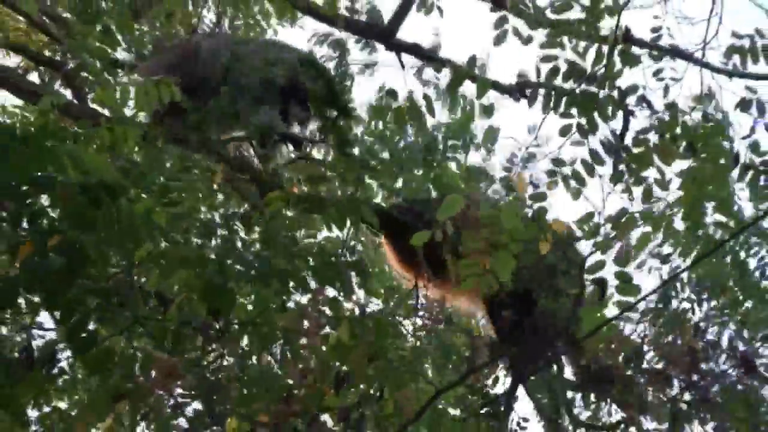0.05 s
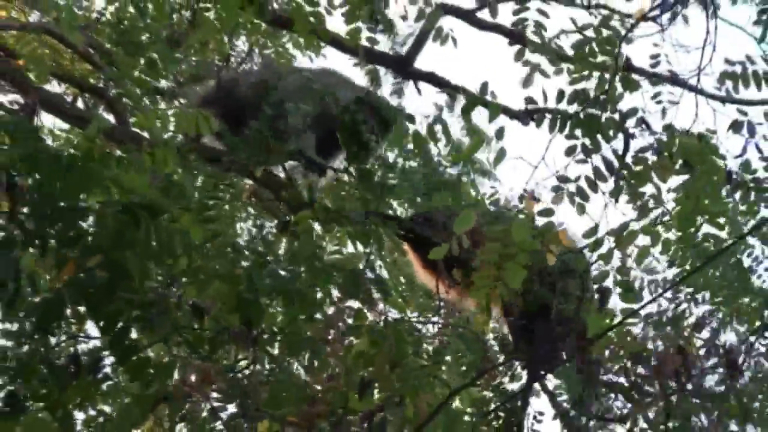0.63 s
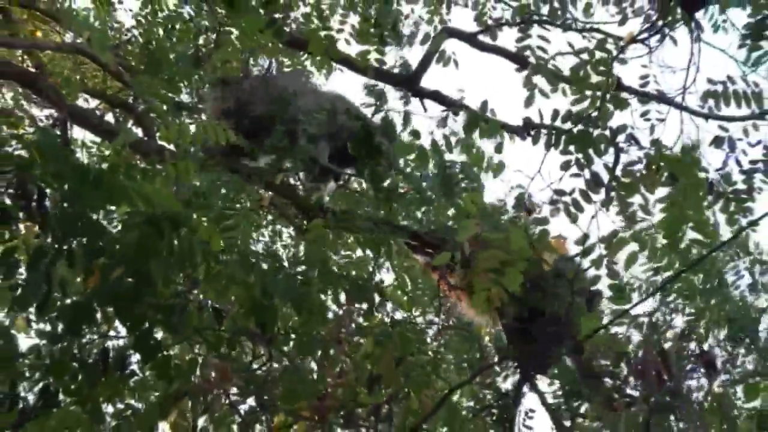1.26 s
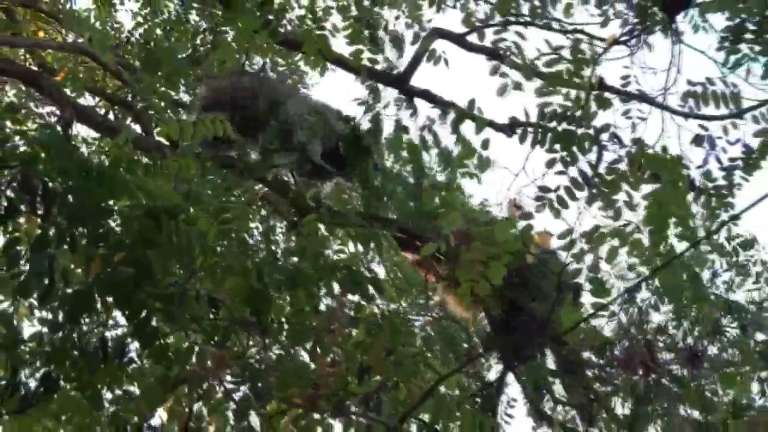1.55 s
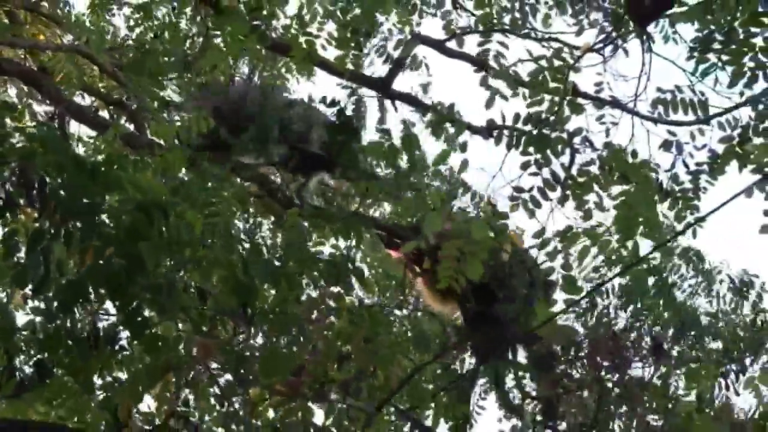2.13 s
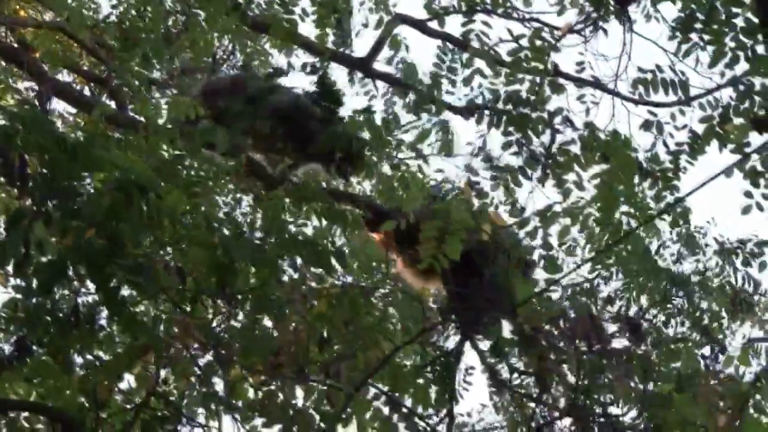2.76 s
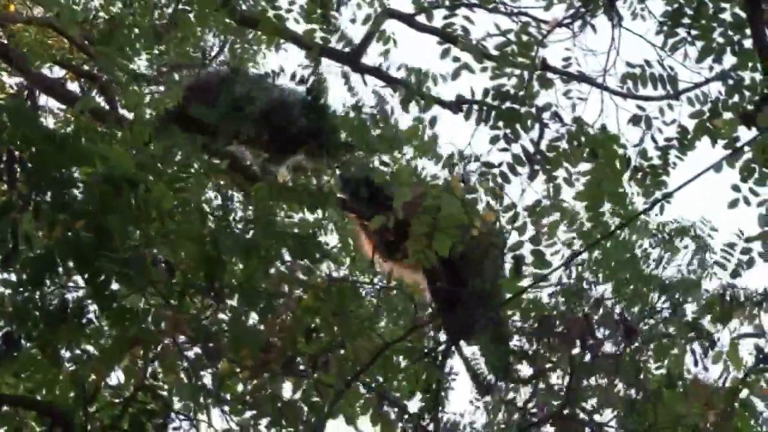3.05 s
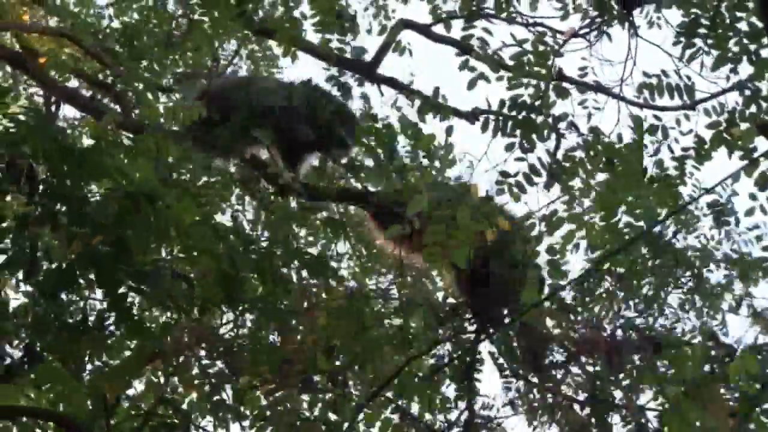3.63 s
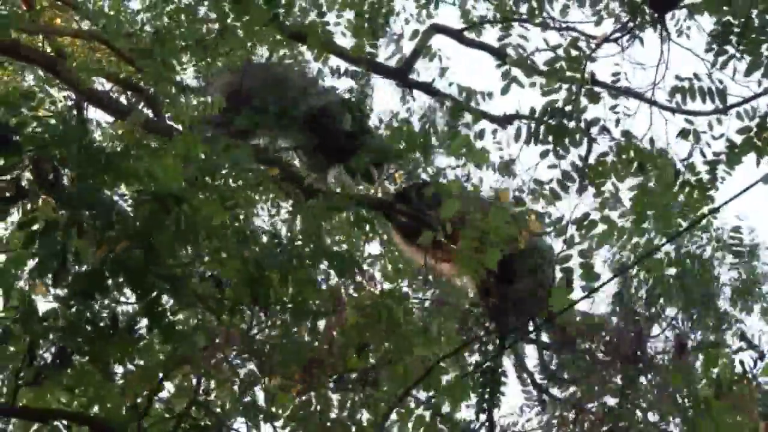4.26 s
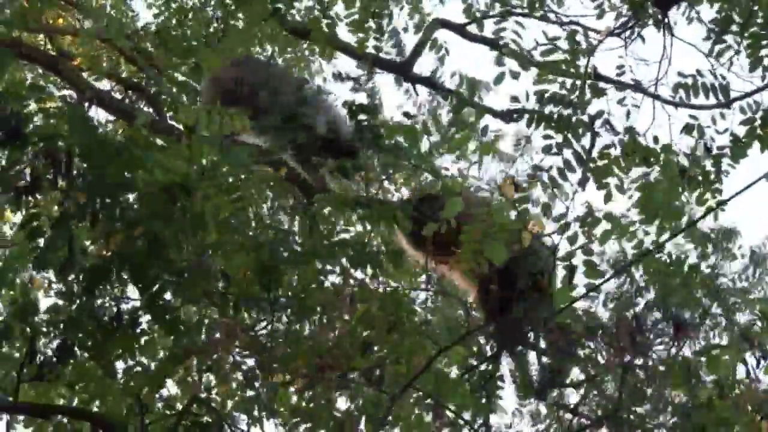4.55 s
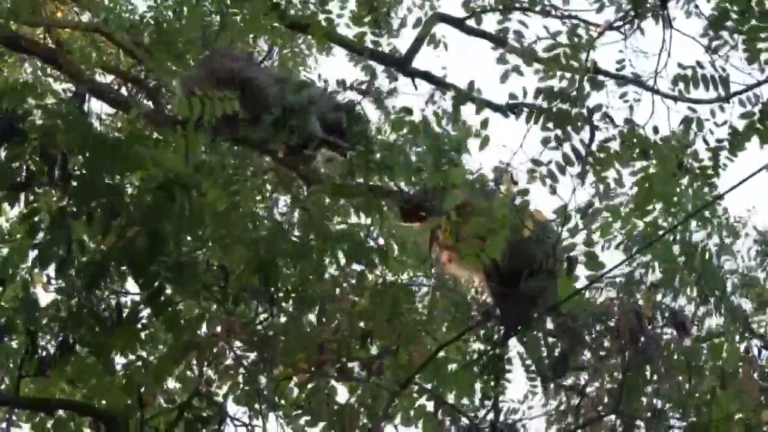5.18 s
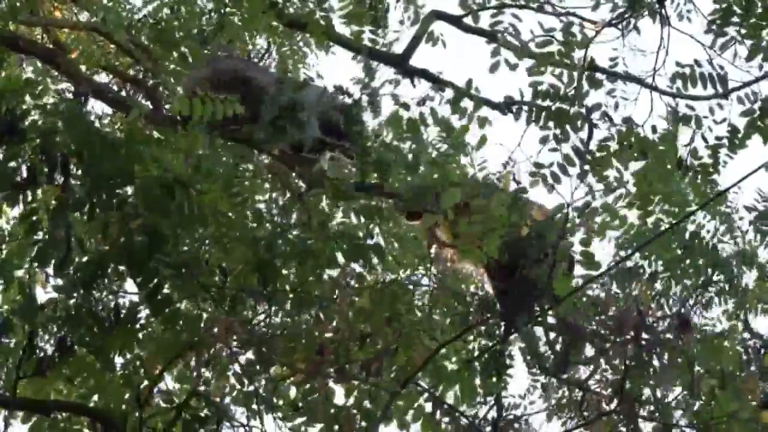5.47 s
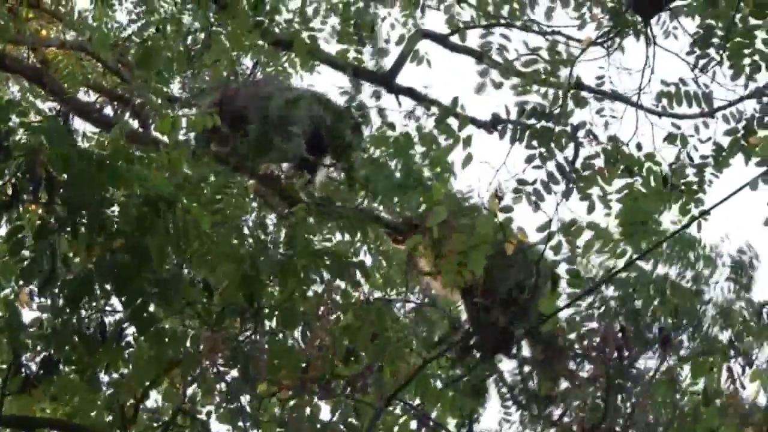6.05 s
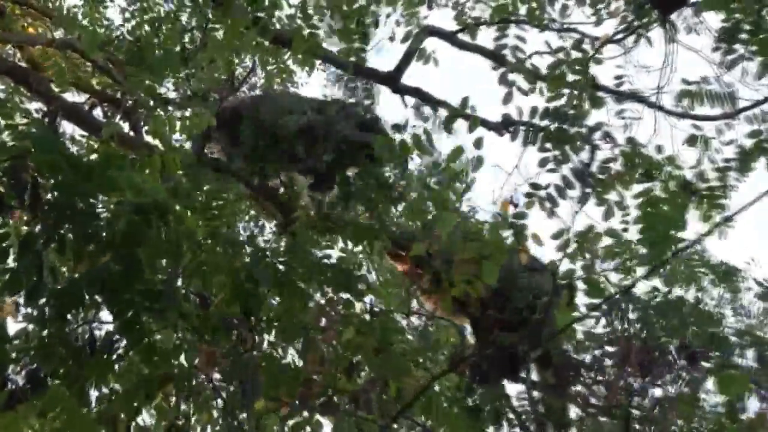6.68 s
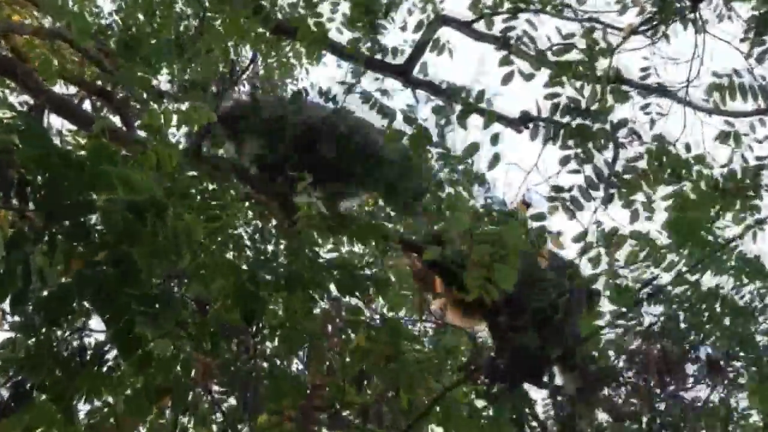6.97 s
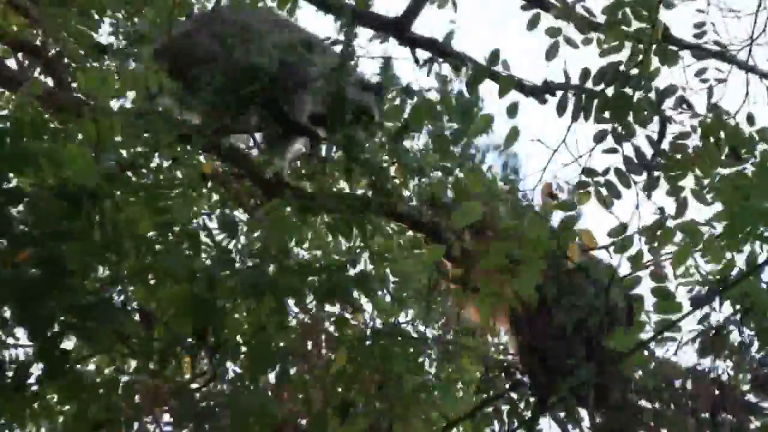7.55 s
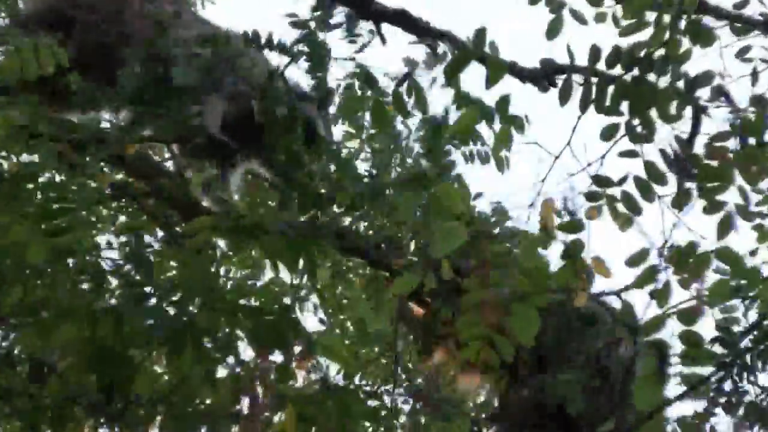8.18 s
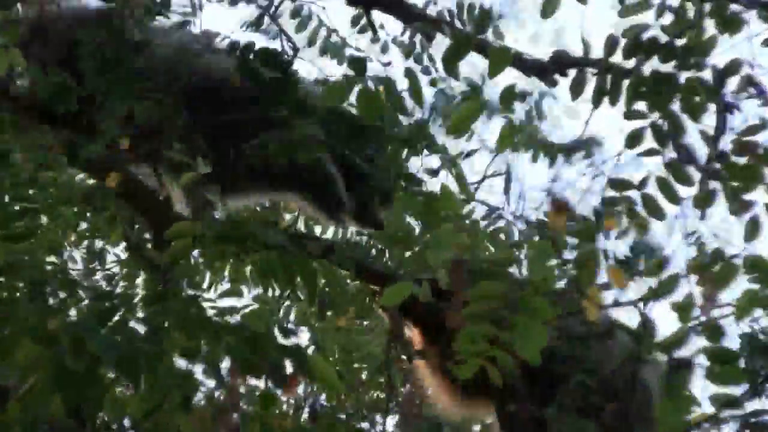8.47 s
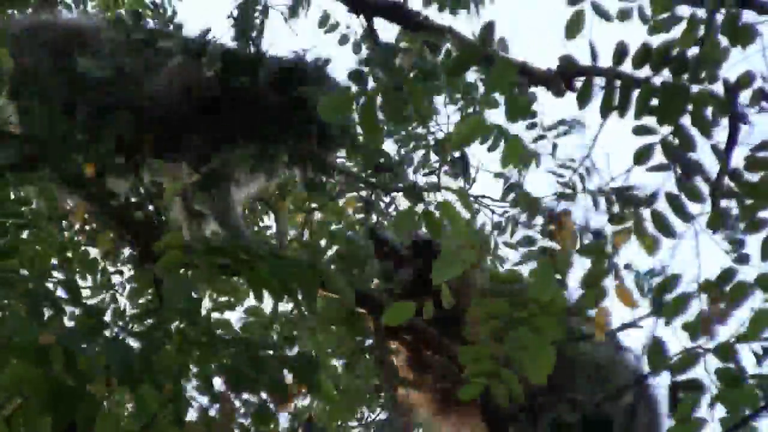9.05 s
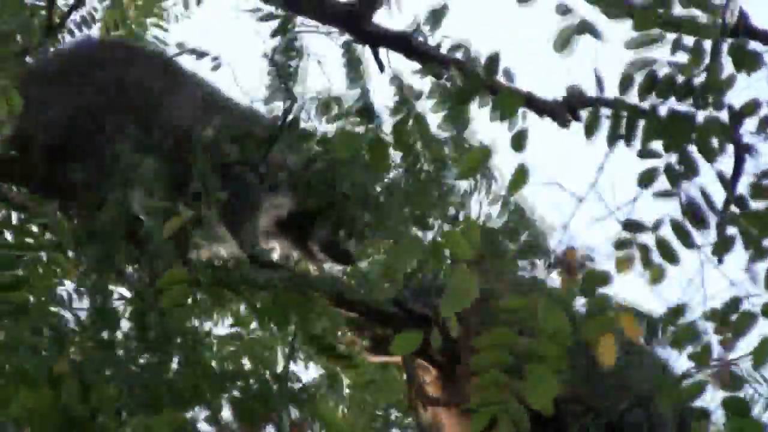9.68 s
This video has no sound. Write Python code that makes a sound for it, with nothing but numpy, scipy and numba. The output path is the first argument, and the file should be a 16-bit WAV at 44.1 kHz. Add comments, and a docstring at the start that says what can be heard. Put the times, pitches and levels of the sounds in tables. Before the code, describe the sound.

Raccoons growl, rasp and snarl at each other in short hissing outbursts on a leafy branch, over a faint distant rumble.

```python
"""Snarls and growls of two raccoons quarrelling on a branch, heard from the ground below.
Snarls and barks: fast chaotic pulses through an open mouth, with hiss at the teeth. Growls: slow
slaps of throat tissue behind a nearly shut mouth. Air rasps and wheezes in a tight throat; one whines.
Twigs snap, leaves rustle and a distant rumble lies underneath. The ground reflects voices and snaps;
the surroundings add a thin tail."""
import sys
import numpy as np
from scipy import signal
from scipy.fft import rfft, irfft, next_fast_len
from scipy.io import wavfile
from scipy.ndimage import uniform_filter1d
from numba import njit

SR = 44100
rng = np.random.default_rng(int(sys.argv[2]) if len(sys.argv) > 2 else 0)


def store_pcm(level_fs):
    """Save levels as 16-bit WAV."""
    pcm = np.round(np.clip(level_fs, -1, 1) * 32767).astype(np.int16)
    wavfile.write(sys.argv[1], SR, np.atleast_2d(pcm).T)


N = 432621
TIME = np.arange(N) / SR


def from_db(db):
    return 10 ** (np.asarray(db) / 20)


def unit_rms(x):
    return x / np.sqrt(np.mean(x ** 2) + 1e-20)


def level_out(x, window_samples=700):
    """Hold the short-term RMS at one."""
    return x / np.sqrt(np.abs(uniform_filter1d(x * x, window_samples)) + 1e-12)


def interp_rows(rows, x):
    """Interpolate the other columns against the first."""
    knots, *columns = np.transpose(rows)
    return [np.interp(x, knots, column) for column in columns]


def gated_span(start_s, end_s, rise_s=0.0017, fall_s=0.006):
    """Sample indices and linear gate of one event."""
    at = np.arange(max(0, int(start_s * SR)), min(N, int((end_s + fall_s) * SR)))
    t = at / SR
    return at, np.clip((t - start_s) / rise_s, 0, 1) * np.clip((end_s + fall_s - t) / fall_s, 0, 1)


def drift(t, rate_hz):
    """Linearly interpolated noise, spread near one."""
    position = (t - t[0]) * rate_hz
    count = int(position[-1]) + 2
    return np.interp(position, np.arange(count), rng.standard_normal(count))


def butter(x, edge_hz, kind, order=2):
    return signal.sosfilt(signal.butter(order, edge_hz, kind, fs=SR, output="sos"), x)


def decay(impulses, tau_s):
    return signal.lfilter([1], [1, -np.exp(-1 / (tau_s * SR))], impulses)


def colour(x, spectrum):
    """Minimum-phase filter from rows of freq_hz, gain_db."""
    size = next_fast_len(x.shape[-1] + 2048, True)
    freq_hz, gain_db = np.transpose(spectrum)
    bins_hz = np.maximum(np.arange(size // 2 + 1) * SR / size, 1)
    gain = from_db(np.interp(np.log(bins_hz), np.log(freq_hz), gain_db))
    cepstrum = irfft(np.log(gain), size)
    cepstrum[1:size // 2] *= 2
    cepstrum[size // 2 + 1:] = 0
    return irfft(rfft(x, size) * np.exp(rfft(cepstrum)), size)[..., :x.shape[-1]]


@njit
def resonate(x, centre_hz, width_hz):
    """Two-pole resonance with a moving centre and unity peak gain."""
    y, r = np.zeros(len(x)), np.exp(-np.pi * width_hz / SR)
    for i in range(2, len(x)):
        feedback = 2 * r * np.cos(2 * np.pi * centre_hz[i] / SR) * y[i - 1] - r * r * y[i - 2]
        y[i] = (1 - r * r) / 2 * (x[i] - x[i - 2]) + feedback
    return y


def formant(x, centre_hz, width_hz):
    """Two resonances in series for steep skirts."""
    return resonate(resonate(x, centre_hz, width_hz), centre_hz, width_hz)


# Side relative to mid: freq_hz, gain_db
DIFFUSE_WIDTH = [(50, -27), (100, -28), (200, -12.5), (400, -2.5), (800, -6.5), (1500, -12.5), (4000, -11),
                 (12000, -105.5)]
def diffuse_stereo(mid, side):
    """Diffuse sound differs between the ears mostly in the low mids."""
    return mid + colour(side, DIFFUSE_WIDTH) * np.array([[1], [-1]])


# Reverb tail spectrum: freq_hz, gain_db
TAIL_SPECTRUM = [(100, 5), (400, 5.5), (1000, -1.5), (2200, 2.5), (5000, 0.5), (12000, 3)]
def surroundings(x, scatter_db=-15, scatter_s=0.0016, side_db=-22, tail_gain_db=-15, t60_s=0.85):
    """Direct sound, early scatter from the branches and a thin tail, in stereo."""
    age = np.arange(SR) / SR
    noise = rng.standard_normal((4, SR))
    scatter = noise[2:] * np.exp(-age / scatter_s) * (age > .001)
    mid, side = scatter / np.linalg.norm(scatter[0])
    early = from_db(scatter_db) * mid + from_db(side_db) * side * np.array([[1], [-1]])
    early[:, 0] += 1
    tail = noise[:2] * from_db(-60 * age / t60_s) * np.clip(age / 0.022, 0, 1)
    tail = colour(from_db(tail_gain_db) * tail / np.linalg.norm(tail[0]), TAIL_SPECTRUM)
    return signal.fftconvolve(x[None], early + diffuse_stereo(*tail), axes=1)[:, :N]


def ground_bounce(x, delay_s, reflectance=0.5, cutoff_hz=5000):
    """Direct sound plus one dull ground reflection."""
    pole = np.exp(-2 * np.pi * cutoff_hz / SR)
    delayed = np.pad(x, (int(delay_s * SR), 0))[:N]
    return x + reflectance * signal.lfilter([1 - pole], [1, -pole], delayed)


# Drone envelope: time_s, level_db
DRONE_LEVELS = [(0, -65), (2.5, -60.5), (6, -62), (7.5, -60), (8.3, -54.5), (9.81, -54)]
def drone(band_hz=(62, 105)):
    """Deepest part of the distant rumble: mono, growing towards the end."""
    level_db, = interp_rows(DRONE_LEVELS, TIME)
    return from_db(level_db) * unit_rms(butter(rng.standard_normal(N), band_hz, "band"))


# Rumble spectrum: freq_hz, gain_db
RUMBLE_SPECTRUM = [(25, -43), (45, -29), (65, -7.5), (130, -1), (260, 2.5), (400, -5.5), (750, -3.5),
                   (1200, -8.5), (2100, -14), (2800, -29), (6000, -27.5), (10000, -39), (13500, -57)]
# Rumble envelope: time_s, level_db
RUMBLE_LEVELS = [(0, -41), (1.5, -42.5), (3, -41.5), (4.5, -43), (6, -42), (7.2, -43), (8.3, -43),
                 (9.1, -42.5), (9.81, -39.5)]
def rumble(swell_db=0.8, swell_hz=2.04):
    """Far-off diffuse rumble with a faint hiss on top."""
    mid, side = (unit_rms(colour(white, RUMBLE_SPECTRUM)) for white in rng.standard_normal((2, N)))
    level_db, = interp_rows(RUMBLE_LEVELS, TIME)
    return from_db(level_db + swell_db * drift(TIME, swell_hz)) * diffuse_stereo(mid, side)


# Rustle spectrum: freq_hz, gain_db
LEAF_SPECTRUM = [(1000, -37), (2800, -3), (4500, 0), (6000, 1), (7000, 1), (9500, 3.5), (11500, 3.5),
                 (13500, -8.5)]
# Branch shakes: start_s, level_db
LUNGES = [(1.78, -51.5), (3.15, -45), (3.87, -46.5), (6.48, -54.5), (7.0, -45), (8.78, -42.5), (9.52, -89)]
def leaves(breeze_db=-63, attack_s=0.054, settle_db_per_s=12, touches_per_s=60, touch_s=0.0026):
    """Leaves brush together in a ticking hiss, stirred by a breeze and by each lunge."""
    touches = (rng.random(N) < touches_per_s / SR) * from_db(-7 * rng.standard_normal(N))
    ticks = unit_rms(decay(touches + 1e-18, touch_s))
    power = from_db(breeze_db) ** 2
    for start_s, level_db in LUNGES:
        age = np.maximum(TIME - start_s, 0)
        shake = np.minimum(age / attack_s, 1) * from_db(level_db - settle_db_per_s * age)
        power = power + shake ** 2
    hiss = (1 + 0.21 * ticks) * rng.standard_normal(N)
    return np.sqrt(power) * unit_rms(colour(hiss, LEAF_SPECTRUM))


# Twig breaks, before gain and spectrum: start_s, level_db, highpass_hz, rustle_rel_db
SNAPS = [(6.0727, -22, 6000, -14), (9.198, -18, 617, -39), (9.5155, -3.5, 403, -12.5),
         (9.536, -9, 3240, -14)]
# Breaking wood: freq_hz, gain_db
WOOD_SPECTRUM = [(200, 2), (1000, -2), (2200, 3.5), (4200, 6), (6500, -3), (9000, 2), (13500, -6)]
def twigs(gain_db=-8, crack_s=0.0014, rustle_s=0.036):
    """Wood cracks, then the shaken leaves rustle; thin twigs have no low end."""
    out = np.zeros(N)
    for start_s, level_db, highpass_hz, rustle_rel_db in SNAPS:
        at, _ = gated_span(start_s, start_s + .25)
        age = (at - at[0]) / SR
        envelope = np.exp(-age / crack_s) + from_db(rustle_rel_db) * np.exp(-age / rustle_s)
        burst = butter(envelope * rng.standard_normal(len(at)), highpass_hz, "high")
        out[at] += from_db(level_db + gain_db) * burst
    return colour(out, WOOD_SPECTRUM)


# Wheezes: start_s, length_s, first_db, last_db, centre_hz
WHEEZES = [(1.674, 0.037, -44, -48, 1800), (6.751, 0.093, -41, -50, 2020), (8.163, 0.14, -42.5, -53, 1900),
           (8.266, 0.172, -59, -54, 2100), (8.951, 0.144, -32, -34, 1980)]
def wheezes(width_hz=420):
    """Turbulent air rings one resonance of a narrowed throat."""
    out = np.zeros(N)
    for start_s, length_s, first_db, last_db, centre_hz in WHEEZES:
        at, gate = gated_span(start_s, start_s + length_s, rise_s=0.018, fall_s=0.014)
        ring = formant(rng.standard_normal(len(at)), np.full(len(at), float(centre_hz)), width_hz)
        out[at] += gate * from_db(np.linspace(first_db, last_db, len(at))) * unit_rms(ring)
    return out


# Whine contour: time_s, pitch_hz, level_db
WHINE_CONTOUR = [(5.445, 630, -46), (5.475, 690, -38), (5.5, 740, -36), (5.522, 835, -40), (5.55, 925, -38),
                 (5.573, 1005, -38), (5.592, 1115, -38), (5.612, 1195, -36), (5.648, 1230, -36),
                 (5.675, 1200, -52)]
# Nasal response: freq_hz, gain_db
NOSE_RESPONSE = [(600, 0), (1250, 0), (1600, -7), (2000, -14), (2450, -14), (3000, -30), (3600, -19),
                 (4500, -19), (5000, -23), (5600, -22), (6200, -26), (6700, -25), (8500, -29)]
def whine(pitch_waver=0.02, rough_db=3, tilt_db=6, harmonics=7):
    """A reedy voice slides up an octave, its harmonics crossing the resonances of the nose."""
    at, gate = gated_span(WHINE_CONTOUR[0][0], WHINE_CONTOUR[-1][0])
    t = at / SR
    pitch_hz, level_db = interp_rows(WHINE_CONTOUR, t)
    phase = 2 * np.pi * np.cumsum(pitch_hz * (1 + pitch_waver * drift(t, 149))) / SR
    db_per_harmonic = tilt_db * np.log2(pitch_hz / pitch_hz.max())   # a slack, low voice is purer
    out = np.zeros(N)
    for k in range(1, harmonics + 1):
        nose_db, = interp_rows(NOSE_RESPONSE, k * pitch_hz)
        harmonic_db = nose_db + (k - 1) * db_per_harmonic + rough_db * drift(t, 130)
        out[at] += gate * from_db(level_db + harmonic_db) * np.sin(k * phase)
    return out


def flutter(t, pulse_hz, jitter, shimmer_db, breath, puff_s):
    """Tissue slaps shut at uneven intervals; each slap passes a puff of turbulent air."""
    rate_hz = pulse_hz * np.exp(jitter * drift(t, pulse_hz))
    cycles = np.floor(np.cumsum(rate_hz) / SR)
    slaps = np.diff(cycles, prepend=-1) * from_db(shimmer_db * rng.standard_normal(len(t)))
    puffs = decay(slaps, puff_s) * rng.standard_normal(len(t))
    return level_out(unit_rms(slaps) + breath * unit_rms(puffs))


# Tight-throat resonances: centre_hz, width_hz, gain_db
RASP_RINGS = [(1215, 230, 4), (1830, 270, 3), (3850, 400, -16)]
def rasp_rings(source, t, progress, waver=.025, waver_hz=18, flicker_db=1, sag=.07):
    """Resonances waver as the throat moves and sink as the rasp runs out."""
    rings = 0
    for centre_hz, width_hz, gain_db in RASP_RINGS:
        gain = from_db(gain_db + flicker_db * drift(t, waver_hz))
        tuning = 1 - sag * (progress - .5) + waver * drift(t, waver_hz)
        rings += gain * formant(source, centre_hz * tuning, width_hz)
    return unit_rms(rings)


# Throat, nose and chest spectra: freq_hz, gain_db
THROAT_SPECTRUM = [(40, -49), (350, -15.5), (560, -2.5), (720, -3), (880, -12), (1140, 3), (1300, -5.5),
                   (1500, -3.5), (1800, 5), (2050, -5.5), (2350, -4), (2800, -11), (3100, -31), (5000, -63)]
NOSE_SPECTRUM = [(2500, 6.5), (3100, 1.5), (3600, 7.5), (4250, 5), (4800, 5.5), (5800, 6.5), (6700, -9),
                 (7800, 3), (9300, -1), (11000, -4.5), (13500, -21)]
CHEST_SPECTRUM = [(50, -67), (110, -15.5), (155, -2.5), (290, -5.5), (360, -4), (430, -1.5), (560, -7.5),
                  (900, -39)]
# In-breaths, before gains: start_s, length_s, level_db, swell_db, nose_rel_db, ring_rel_db
RASPS = [(.27, 0.77, -42, 10, -7.5, -4), (1.919, 0.52, -38.5, -0.5, -8.5, -9.5),
         (3.251, 0.48, -34, -3, -12, -16), (4.1, 0.69, -38.5, 4, -8, -10),
         (4.721, 0.33, -37, -1.5, -5.5, -20), (5.581, 0.63, -41, 1, -9, -5.5),
         (6.706, 0.29, -44, 12, -4, 1.5), (7.168, 0.54, -32, -3, -6.5, -7.5),
         (8.9, 0.52, -33.5, -3, -6.5, -17)]
def rasps(attack_s=0.14, attack_db=4.5, release_s=0.1, release_db=16.5, arch_db=2, waver_db=1.1,
          throat_gain_db=-0.5, nose_gain_db=-1.5):
    """One inward airflow flutters and rings in the throat, hisses in the nose and hums in the chest."""
    out = np.zeros(N)
    for start_s, length_s, level_db, swell_db, nose_rel_db, ring_rel_db in RASPS:
        at, gate = gated_span(start_s, start_s + length_s + release_s, rise_s=0.0062, fall_s=0.021)
        t = at / SR
        age = t - start_s
        progress = np.clip(age / length_s, 0, 1)
        flow_db = level_db + swell_db * (progress - .5) + arch_db * (np.sin(np.pi * progress) - .5)
        flow_db -= attack_db * np.clip(1 - age / attack_s, 0, 1)
        flow_db -= release_db * np.clip((age - length_s) / release_s, 0, 1)
        source = flutter(t, pulse_hz=109.7, jitter=.5, shimmer_db=1.5, breath=2.6, puff_s=0.0073)
        throat_db = flow_db + throat_gain_db + waver_db * drift(t, 37)
        nose_db = flow_db + nose_rel_db + nose_gain_db
        chest_db = -44 + 0.68 * (flow_db + 38.5)   # follows the flow only in part
        throat = from_db(throat_db) * unit_rms(colour(source, THROAT_SPECTRUM))
        nose = from_db(nose_db) * unit_rms(colour(rng.standard_normal(len(t)), NOSE_SPECTRUM))
        chest = from_db(chest_db) * unit_rms(colour(source, CHEST_SPECTRUM))
        rings = from_db(flow_db + ring_rel_db) * rasp_rings(source, t, progress)
        out[at] += gate * (throat + rings + nose + chest)
    return out


def growl_rings(source, resonances, spread_db=2.8, detune=.04):
    """Parallel throat resonances, each randomly off in strength and pitch."""
    rings = 0
    for centre_hz, width_hz, gain_db in resonances:
        louder, higher = rng.standard_normal(2)
        detuned_hz = np.full(len(source), centre_hz * (1 + detune * higher))
        rings += from_db(gain_db + spread_db * louder) * resonate(source, detuned_hz, width_hz)
    return rings


# Throat resonances, mouth nearly shut: centre_hz, width_hz, gain_db
SHUT_THROAT = [(234, 114, -2), (710, 110, 5), (1048, 97, 3.5), (1127, 110, 15), (1280, 52, -10.5)]
# Resonances let out as the lips part: centre_hz, width_hz, gain_db
UPPER_THROAT = [(1440, 490, -7), (1690, 180, 6.5)]
def growl_pulse(upper_db, air=.45, puff_s=0.022, stray_db=-12, cutoff_hz=2150):
    """A slap of slack tissue, a stray slap and an air puff ring the throat; the mouth muffles them."""
    size, lead_samples = 2400, 220
    age = np.arange(size) / SR
    puff = rng.standard_normal(size) * np.exp(-age / puff_s)
    source = air * puff / np.linalg.norm(puff)
    source[lead_samples] += 1
    source[rng.integers(size // 2)] += from_db(stray_db)
    voice = growl_rings(source, SHUT_THROAT) + from_db(upper_db) * growl_rings(source, UPPER_THROAT)
    voice = butter(voice, cutoff_hz, "low", order=10)
    return np.arange(size) - lead_samples, voice / np.abs(voice).max()


# Pulse runs, before gain: start_s, end_s, pulse_hz, peak_db, sag_db, upper_db
GROWLS = [(0.016, 0.18, 36.6, -27, -4, -13), (1.157, 1.242, 35.3, -25, -0.5, 1),
          (1.269, 1.548, 35.8, -23.5, 7, 0), (1.575, 1.61, 29, -26, 10, -2), (2.57, 2.57, 38, -29, 0, 2),
          (2.595, 2.595, 38, -19.5, 0, 1), (2.626, 2.734, 37, -23.5, -1.5, -2.5),
          (2.76, 2.838, 38.5, -24.5, 0, -2), (2.865, 2.891, 38, -23.5, -2, 1),
          (2.918, 2.947, 35, -26.5, 2, -4), (5.18, 5.215, 28, -27.5, 1, -1),
          (5.237, 5.292, 36, -27, 11, -8), (5.315, 5.392, 39, -27.5, -1, -10),
          (5.425, 5.529, 38.5, -28.5, 1.5, -8), (6.377, 6.403, 38, -22.5, 5, 0),
          (6.432, 6.51, 38.5, -26.5, -3, -3), (6.533, 6.557, 41, -21.5, -1, 13),
          (6.583, 6.637, 37, -25, 1, -5), (6.661, 6.687, 38, -22.5, 1.5, -4),
          (7.837, 7.837, 38, -29, 0, -8), (7.929, 8.007, 38, -25.5, 7, -13), (8.029, 8.029, 38, -21, 0, -7),
          (8.058, 8.112, 37, -29, 6, -7)]
def growls(gain_db=2.0, jitter_s=.0005):
    """Runs of slow, separate throat pulses, no two alike."""
    out = np.zeros(N)
    for start_s, end_s, pulse_hz, peak_db, sag_db, upper_db in GROWLS:
        count = int(round((end_s - start_s) * pulse_hz)) + 1
        for progress in np.linspace(0, 1, count):
            slap_s = start_s + (end_s - start_s) * progress + jitter_s * rng.standard_normal()
            offsets, pulse = growl_pulse(upper_db)
            at = np.clip(offsets + int(slap_s * SR), 0, N - 1)
            out[at] += from_db(peak_db + gain_db - sag_db * progress) * pulse
    return out


def mouth_formants(source, formants, mouth_hz, width_ratio):
    """Parallel mouth resonances of alternating polarity."""
    return sum((-1) ** k * from_db(gain_db) * formant(source, ratio * mouth_hz, width_ratio * width_hz)
               for k, (ratio, width_hz, gain_db) in enumerate(formants))


# Deep and bright mouth resonances: freq_ratio, width_hz, gain_db
DEEP_FORMANTS = [(.36, 298, -15), (.64, 327, -4.5)]
BRIGHT_FORMANTS = [(.93, 420, 9.5), (1.17, 580, 1.5), (1.5, 710, -15)]
# Hiss at the teeth: freq_hz, gain_db
TEETH_SPECTRUM = [(1500, -23.5), (2650, 10.5), (3050, 5.5), (3600, 1.5), (4150, 0.5), (4500, -3),
                  (5200, -2.5), (6200, -10.5), (7000, -14), (8300, -10.5), (11000, -21), (13500, -32)]
def open_mouth_voice(level_db, mouth_hz, hiss_db, deep_db=0, width_ratio=1, body_db=-27):
    """Fast chaotic pulses ring the open mouth and hiss at the teeth."""
    warmup_samples = 400
    mouth_hz = np.pad(mouth_hz, (warmup_samples, 0), mode="edge")
    t = np.arange(len(mouth_hz)) / SR
    source = flutter(t, pulse_hz=190, jitter=.35, shimmer_db=2, breath=1.9, puff_s=0.0035)
    deep = from_db(deep_db) * mouth_formants(source, DEEP_FORMANTS, mouth_hz, width_ratio)
    bright = mouth_formants(source, BRIGHT_FORMANTS, mouth_hz, width_ratio)
    # The screech grows as the deep resonances weaken.
    screech = from_db(-19 - 0.7 * deep_db) * formant(source, 2.4 * mouth_hz, width_hz=550)
    body = from_db(body_db) * unit_rms(butter(source, [350, 750], "band"))
    voice = level_out(bright + screech + deep, window_samples=400) + body
    turbulence = source + 1.5 * rng.standard_normal(len(t))
    hiss = level_out(colour(turbulence, TEETH_SPECTRUM))
    return from_db(level_db) * (voice[warmup_samples:] + from_db(hiss_db) * hiss[warmup_samples:])


# Barks: start_s, length_s, level_db, mouth_hz, hiss_rel_db
BARKS = [(1.806, 0.0067, -34.5, 1220, -18), (1.826, 0.009, -30, 1810, -14), (1.838, 0.0068, -23, 1590, -14),
         (1.861, 0.017, -25, 1610, -10), (3.067, 0.016, -30, 1210, -20), (3.571, 0.0037, -24, 1180, -14),
         (4.303, 0.0084, -33, 1910, -23), (4.331, 0.0079, -26.5, 1810, -32),
         (8.534, 0.0072, -40, 1400, -14), (9.198, 0.003, -24, 1910, -11)]
def barks():
    """Very short bursts from the open mouth, jaw still."""
    out = np.zeros(N)
    for start_s, length_s, level_db, mouth_hz, hiss_rel_db in BARKS:
        at, gate = gated_span(start_s, start_s + length_s, rise_s=0.0015)
        out[at] += gate * open_mouth_voice(level_db, np.full(len(at), float(mouth_hz)), hiss_rel_db)
    return out


# Snarls, before gains: start_s, length_s, attack_s, level_db, fade_db, first_mouth_hz, last_mouth_hz,
# first_hiss_rel_db, last_hiss_rel_db, deep_db, width_ratio
SNARLS = [(1.887, 0.03, 0.014, -18, -0.5, 1610, 1620, -9, -21.5, 7, 1.2),
          (3.096, 0.035, 0.052, -20.5, -3, 1860, 1830, -29, -18.5, 6, 1),
          (3.154, 0.049, 0.0061, -9, 3.5, 1970, 2050, -21, -14, -11, 1.2),
          (3.205, 0.096, 0.008, -14.5, 8, 2000, 1880, -21, -17, 2, .9),
          (3.305, 0.093, 0.052, -20, -0.5, 1930, 1800, -18, -17.5, 2, 0.75),
          (3.481, 0.11, 0.027, -30, 0, 1570, 1260, -12, -18, -4, 1.1),
          (3.585, 0.14, 0.057, -20.5, 14.5, 1620, 1510, -20, -12, 5, 1),
          (3.869, 0.028, 0.005, -10, 3, 1760, 1800, -18, -14, 4.5, 1.2),
          (3.905, 0.035, 0.004, -16, -2, 1750, 1900, -15, -16, -2, 1.1),
          (3.942, 0.052, 0.008, -10.5, 2.5, 2080, 2040, -27, -15.5, -19, 0.87),
          (4.003, 0.059, 0.0076, -11.5, 6, 2200, 1780, -12, -13, -18, 1),
          (4.358, 0.069, 0.003, -23.5, 11, 1660, 1950, -22, -11, 8, 0.97),
          (6.959, 0.024, 0.018, -20, 0, 1550, 1600, -8, -10, -1, 1.3),
          (6.98, 0.037, 0.012, -11, 0.5, 1690, 2650, -13, -11.5, 5, 1.1),
          (7.033, 0.036, 0.0065, -11.5, 0.5, 2450, 2150, -10, -15.5, -19, 1.1),
          (7.081, 0.069, 0.0081, -10.5, 2, 2000, 1870, -16.5, -19, -6.5, 0.75),
          (8.557, 0.063, 0.0045, -38, 2, 1560, 1600, -15.5, -9, 5, 1),
          (8.605, 0.01, 0.0052, -13, 0.5, 1670, 1650, -12, -18, -1, 0.75),
          (8.64, 0.076, 0.005, -18.5, 14, 1730, 1980, -13, -11.5, -2, 1.3),
          (8.812, 0.021, 0.0043, -10, 6.5, 1950, 1730, -14, -10, -6, 1.3),
          (8.841, 0.032, 0.0059, -22, 0, 1570, 1250, -18, -7.5, 3, 0.51),
          (8.877, 0.031, 0.004, -18.5, -0.5, 1350, 1900, -4, -13.5, 5, .9),
          (8.91, 0.04, 0.0034, -22, 4.5, 1970, 1950, -20, -15, 9, 0.79),
          (8.963, 0.25, 0.022, -30, 10, 2030, 2250, -11, -7, 1, 0.96),
          (9.204, 0.2, 0.0046, -27.5, 17.5, 1840, 1840, -18, -3, 11, 1.4),
          (9.631, 0.08, 0.047, -30.5, 1.5, 1750, 1900, -31, -26, 18, 1.1),
          (9.774, 0.038, 0.021, -33, 2, 1580, 2200, -25, -18, 14, 1.1)]
def snarls(gain_db=-3.0, swell_db=5.5, release_s=0.059, release_db=25.5,
           jaw_arch=0.023, tremble=0.044, tremble_hz=61.2,
           hiss_gain_db=7.5, linger_db=13, teeth_lag_s=.02, teeth_lag_db=10,
           rattle_db=1.7, rattle_hz=170, throb_db=1.64, throb_hz=66):
    """Each snarl swells, throbs unevenly and dies away in hiss while the jaw moves its resonances."""
    out = np.zeros(N)
    for (start_s, length_s, attack_s, level_db, fade_db, first_mouth_hz, last_mouth_hz,
         first_hiss_rel_db, last_hiss_rel_db, deep_db, width_ratio) in SNARLS:
        at, gate = gated_span(start_s, start_s + length_s + release_s, rise_s=0.0035, fall_s=0.025)
        age = at / SR - start_s
        progress = np.clip(age / length_s, 0, 1)
        release = np.clip((age - length_s) / release_s, 0, 1)
        mouth_hz = first_mouth_hz + (last_mouth_hz - first_mouth_hz) * progress
        mouth_hz *= 1 + jaw_arch * np.sin(np.pi * progress) + tremble * drift(age, tremble_hz)
        hiss_db = first_hiss_rel_db + (last_hiss_rel_db - first_hiss_rel_db) * progress
        hiss_db += hiss_gain_db + linger_db * release
        hiss_db -= teeth_lag_db * np.clip(1 - age / teeth_lag_s, 0, 1)   # teeth bared after the onset
        shape_db = np.interp(age, [0, attack_s, max(attack_s, length_s)], [-swell_db, 0, -fade_db])
        voice_db = level_db + gain_db + shape_db - release_db * release
        voice_db += rattle_db * drift(age, rattle_hz) + throb_db * drift(age, throb_hz)
        out[at] += gate * open_mouth_voice(voice_db, mouth_hz, hiss_db, deep_db, width_ratio)
    return out


def scene(growler_delay_s=.00692, snarler_delay_s=.00702, balance_db=.15):
    """Two animals and their branch in open air, the mix slightly to the left."""
    growler = ground_bounce(growls() + rasps() + wheezes() + whine(), growler_delay_s)
    snarler = ground_bounce(snarls() + barks(), snarler_delay_s)
    animals = butter(growler + snarler, 80, "high")
    snaps = ground_bounce(twigs(), snarler_delay_s)
    mix = surroundings(animals + snaps) + leaves() + rumble() + drone()
    return mix * from_db([[balance_db], [-balance_db]])


def record(dry, saturation=1.05, cutoff_hz=13400):
    """Soft clip, then a steep low-pass."""
    rounded = saturation * np.tanh(dry / saturation)
    return 0.98 * signal.sosfilt(signal.ellip(10, .1, 80, cutoff_hz, fs=SR, output="sos"), rounded)


dry = scene()
out = record(dry)
store_pcm(out)
```